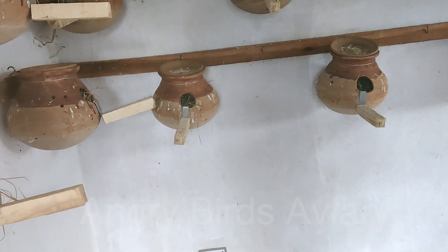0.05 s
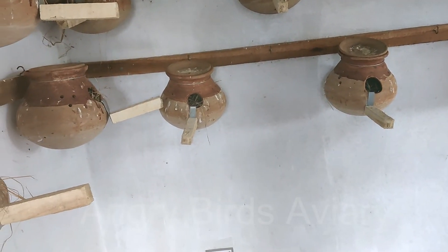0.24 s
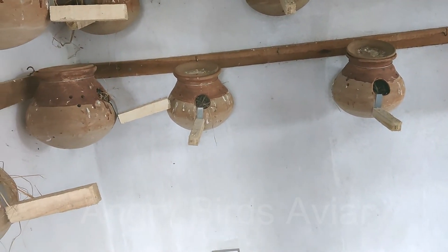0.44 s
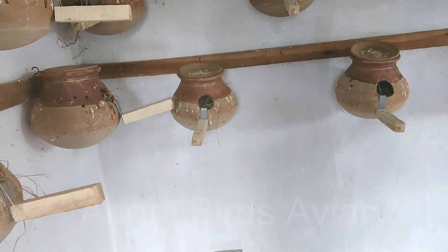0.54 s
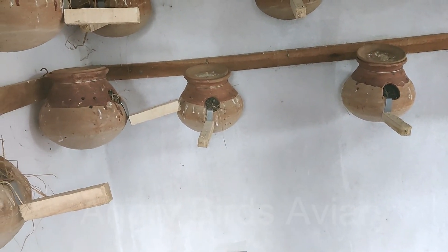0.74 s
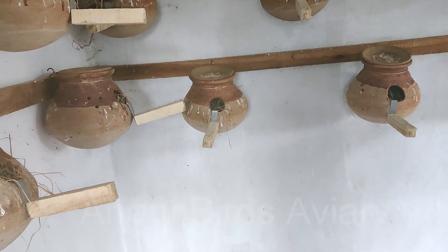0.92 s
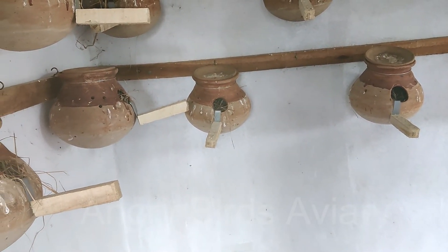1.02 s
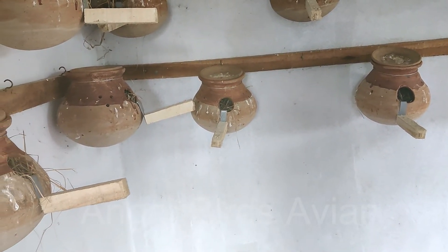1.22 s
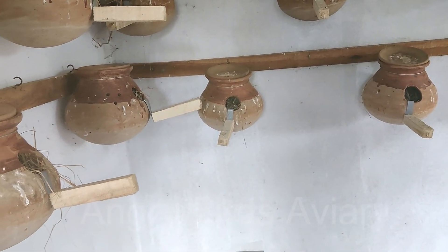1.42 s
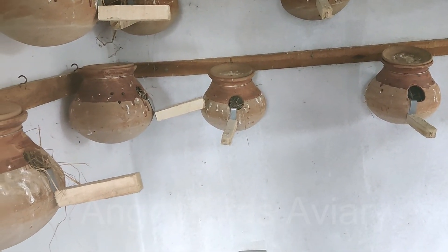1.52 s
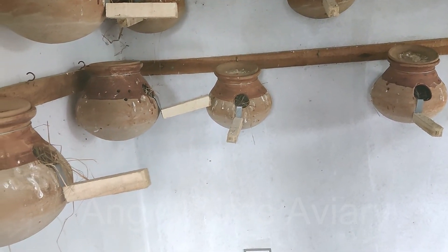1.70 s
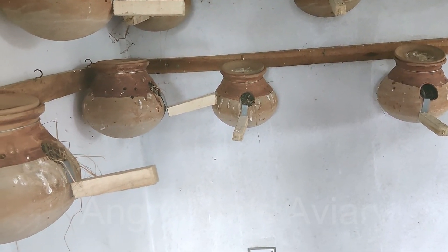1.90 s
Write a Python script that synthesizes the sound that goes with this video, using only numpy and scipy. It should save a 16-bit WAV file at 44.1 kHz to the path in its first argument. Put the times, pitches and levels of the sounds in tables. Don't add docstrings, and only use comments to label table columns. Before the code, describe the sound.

Finch chirps, near and clipped at first, then distant buzzy whistles, over a low fan hum

```python
import sys
import numpy as np
from scipy import signal
from scipy.fft import rfft, irfft, next_fast_len
from scipy.io import wavfile
from scipy.ndimage import uniform_filter1d

SR = 44100
rng = np.random.default_rng(int(sys.argv[2]) if len(sys.argv) > 2 else 0)


def unload_wav(signal):
    wavfile.write(
        sys.argv[1],
        SR,
        np.round(np.clip(np.atleast_2d(signal).T, -1, 1) * 32767).astype(np.int16),
    )


def natural_amplitude(level_db):
    exponent = np.asarray(level_db, float) / 20
    return 10 ** exponent


N = 85995

# freq_hz, density_db_per_hz
AIR_SPECTRUM = [(18, -34.5), (30, 0.5), (71, -14.5), (189, -27.5), (364, -25), (843, -29.5), (1670, -26),
                (3940, -29.5), (6800, -26), (8840, -71), (15000, -120)]
# time_s, gain_db
INPUT_GAIN = [(0, 15), (.1, 8.5), (.5, 7.5), (.8, 5.5), (1.0, 1), (1.95, 0.5)]
# time_s, level_db
FAN_THROB = [(0.0, -49.5), (0.102, -36), (0.314, -36.5), (0.504, -64), (0.65, -43.5), (0.82, -68),
             (0.906, -54), (0.982, -58.5), (1.276, -49), (1.568, -43.5), (1.792, -46.5), (1.95, -63)]
# time_s, level_db
HISS_LEVEL = [(0, -64), (.65, -63), (.85, -76), (1.0, -76), (1.4, -74.5), (1.95, -87)]
# freq_hz, gain_db
MIC_RESPONSE = [(6700, -1.5), (7150, -10), (15000, -32)]
# freq_hz, t60_s
REVERB_TIME = [(1000, 0.49), (3000, 0.49), (6000, 0.31), (12000, 0.57)]
# delay_s, level_db
WALL_ECHOES = [(.012, -5), (0.028, -17), (.037, -21), (0.064, -7)]
# start_s, length_s, start_hz, end_hz, level_db
FAR_WHISTLES = [(0.915, 0.028, 3300, 3216, -56), (1.062, 0.02, 3470, 3230, -40.5),
                (1.085, 0.0585, 2796, 3075, -43.5), (1.12, 0.0324, 2995, 3183, -41),
                (1.14, 0.034, 5980, 6740, -52.5), (1.17, 0.023, 3025, 3326, -48.5),
                (1.2, 0.019, 2958, 2893, -44), (1.3, 0.0555, 3100, 3436, -43),
                (1.335, 0.062, 3120, 4370, -41.5), (1.525, 0.067, 4360, 3627, -45),
                (1.575, 0.071, 3227, 4315, -39.5), (1.605, .075, 5410, 3810, -33.5),
                (1.615, .07, 2908, 1970, -54), (1.73, 0.054, 4926, 4350, -41),
                (1.76, 0.043, 4043, 3486, -31.5), (1.785, 0.02, 5940, 6550, -41),
                (1.81, 0.025, 3902, 3330, -33.5), (1.875, 0.029, 3630, 3520, -50),
                (1.9, 0.044, 2460, 2420, -58.5)]
# start_s, length_s, start_hz, end_hz, level_db
NEAR_SLUR = [
    (0.675, 0.0261, 3523, 2855, -20),
]
# start_s, top_pitch_hz, level_db, half_pitch_lines_db, brightness_db_per_octave
LOW_CHIRPS = [
    (0.0, 2084, -33, -38, 3.5),
    (0.026, 2257, -32, -29, -4.5),
    (0.171, 2023, -20, -16.5, 0.5),
    (0.334, 1964, -22.5, 2.5, 0.2),
]
HIGH_CHIRPS = [
    (0.504, 1584, -21, -4, 12),
    (0.592, 1661, -14.5, -8, 3.3),
    (0.755, 1673, -26.5, -8.5, -15.5),
    (0.796, 1666, -14, -14, 1.7),
]
# freq_hz, gain_db
LOW_THROAT_COLOUR = [(900, -64.5), (2000, -13), (3000, -7), (4000, -6), (5000, -18.5), (5900, -14),
                     (6800, -21), (15000, -31.5)]
HIGH_THROAT_COLOUR = [(800, -83.5), (1600, -34.5), (2400, -8), (3200, 0), (4900, -11), (5800, -26.5),
                      (8200, -26.5), (15000, -34)]
# freq_hz, gain_db
COPY_RESPONSE = [(100, -3.5), (1000, -2.5), (1600, -5.5),
                 (2500, -15), (5000, -19)]

AIR_DB = -59.5
HUM_HZ, HUM_WIDTH_HZ, HUM_DB, HUM_UPPER_DB = 118.6, 22, -66.5, -6.5
THROB_HZ, THROB_TRIM_DB = 43, -4.5
NEAR_WET_DB, NEAR_PAN_DB = 2.5, -3.5
FAR_WET_DB, FAR_PAN_DB = 4, -4
BUILD_S = 0.014
LEFT_LAG_SAMPLES = 17
BUZZ_HZ, BUZZ_DEPTH = 139.9, 0.26
WOBBLE, WOBBLE_PER_GLIDE = 0.036, 0.15
UNDERTONE_DB, OCTAVE_DB = -30, -22
RISE, FALL, TOP_AT = 0.2255, 0.14, 0.568
ATTACK_S, RELEASE_S, CHIRP_S = 0.003, 0.0051, 0.01678
CLIFF_HZ, HOLE_DB, HOLE_THRESHOLD = 7150, -30, -0.35
PATCH_FRAMES, PATCH_BINS = 3, 14
COPY_LEAD_S = 0.0174


def curve(table, hz):
    a = np.array(table, float)
    return np.interp(np.log(np.maximum(hz, 1)), np.log(a[:, 0]), a[:, 1])


def over_time(table):
    return np.interp(np.arange(N) / SR, *np.array(table, float).T)


def colour(x, gain):
    n = next_fast_len(x.shape[-1] + 4096)
    hz = np.arange(n // 2 + 1) * SR / n
    return irfft(rfft(x, n) * gain(hz), n)[..., :x.shape[-1]]


def octave_band(x, centre_hz):
    return colour(x, lambda f: np.clip(1 - abs(np.log2(np.maximum(f, 1) / centre_hz)), 0, 1))


def unit(x):
    return x / np.sqrt(np.mean(x ** 2))


def walk(rate_hz, size=N):
    k = max(int(SR / rate_hz), 2)
    smooth = uniform_filter1d(uniform_filter1d(rng.standard_normal(N), k), k)
    return unit(smooth)[:size]


def add(track, start_s, x):
    i = int(max(start_s, 0) * SR)
    track[i:i + len(x)] += x[:N - i]


def shape(t, length_s, attack_s, release_s):
    ramp = np.minimum(t / attack_s, (length_s - t) / release_s)
    return np.sin(np.pi / 2 * np.clip(ramp, 0, 1)) ** 2


def room_tone():
    mid, side = rng.standard_normal((2, N))
    side = colour(side, lambda f: np.clip((f / 1700) ** 0.53, 0, 1.2))
    pair = mid + side * np.array([[1], [-1]])
    pair = colour(pair, lambda f: natural_amplitude(curve(AIR_SPECTRUM, f) + 2 * curve(MIC_RESPONSE, f))
                  / np.hypot(1, np.clip(f / 1000, 0, 1)))
    out = 0
    for hz in 62.5 * 2 ** np.arange(9):
        flicker_db = walk(2.7) + walk(6)
        out = out + octave_band(pair, hz) * natural_amplitude(flicker_db)
    return unit(out) * natural_amplitude(AIR_DB)


def fan_hum():
    def peak(f, hz):
        return 1 / (1 + ((f - hz) / HUM_WIDTH_HZ * 2) ** 4)

    noise = rng.standard_normal(N)
    hum = colour(noise, lambda f: peak(f, HUM_HZ) + natural_amplitude(HUM_UPPER_DB) * peak(f, 1.48 * HUM_HZ))
    return unit(hum) * natural_amplitude(HUM_DB)


def fan_throb():
    f = THROB_HZ * (1 + 0.0077 * walk(4.8))
    return np.sin(2 * np.pi * np.cumsum(f) / SR) * natural_amplitude(over_time(FAN_THROB) + THROB_TRIM_DB)


def hiss():
    noise = rng.standard_normal((2, N))
    noise = unit(colour(noise, lambda f: (f > 7300) * (8000 / (f + 1)) ** 0.48))
    return noise * natural_amplitude(over_time(HISS_LEVEL) + 1.3 * walk(7.6))


def air():
    return (room_tone() + fan_hum()) * natural_amplitude(over_time(INPUT_GAIN)) + hiss() + fan_throb()


def room(x, wet_db, pan_db, decay=1.0):
    t = np.arange(SR) / SR
    echoes = rng.standard_normal((2, SR)) * natural_amplitude(7 * rng.standard_normal((2, SR)))
    tail = 0
    for hz in 320.0 * 2 ** np.arange(6):
        tail = tail + octave_band(echoes, hz) * natural_amplitude(-60 * t / (decay * curve(REVERB_TIME, hz)))
    tail = tail * (1 - np.exp(-t / BUILD_S))
    tail = tail / np.sqrt(np.sum(tail ** 2) / 2) * natural_amplitude(wet_db)
    tail[0, LEFT_LAG_SAMPLES] += 1
    tail[1, 0] += 1
    for delay_s, db in WALL_ECHOES:
        tail[[0, 1], int(delay_s * SR) + rng.integers(0, 60, size=2)] += natural_amplitude(db)
    wet = signal.fftconvolve(x[None], tail, axes=1)[:, :N]
    return wet * natural_amplitude(np.array([[pan_db], [-pan_db]]) / 2 - wet_db / 2)


def whistles(notes, swell=0.35):
    out = np.zeros(N)
    for start_s, length_s, start_hz, end_hz, db in notes:
        t = np.arange(int(length_s * SR)) / SR
        shake = WOBBLE + WOBBLE_PER_GLIDE * abs(np.log(end_hz / start_hz))
        glide = start_hz + (end_hz - start_hz) * t / length_s
        f = glide * (1 + shake * walk(546, size=len(t)))
        phase = np.cumsum(f) * 2 * np.pi / SR
        tone = np.sin(phase)
        tone = tone + natural_amplitude(UNDERTONE_DB) * np.sin(phase / 2)
        tone = tone + natural_amplitude(OCTAVE_DB) * np.sin(2 * phase)
        tone = tone * (1 + BUZZ_DEPTH * np.sin(2 * np.pi * BUZZ_HZ * t))
        add(out, start_s, natural_amplitude(db) * tone * shape(t, length_s, swell * length_s, 0.41 * length_s))
    return out


def near_bird(calls, throat, jitter, rasp, bend):
    out = np.zeros(N)
    t = np.arange(int(CHIRP_S * SR)) / SR
    u = t / CHIRP_S - TOP_AT
    arch = 1 - np.where(u < 0, RISE * (u / TOP_AT) ** 2, FALL * (u / (1 - TOP_AT)) ** 2)
    for start_s, top_hz, db, half_db, tilt_db in calls:
        shake = walk(600, size=len(t))
        f = top_hz * arch ** bend * (1 + jitter * (shake - shake.mean()))
        half_phase = np.cumsum(f) * np.pi / SR
        tone = 0
        for k in range(1, 19):
            line_hz = k * f / 2
            line_db = curve(throat, line_hz) + half_db * (k % 2)
            line_db = line_db + tilt_db * np.log2(np.minimum(line_hz / 3200, 1.4))
            tone = tone + natural_amplitude(line_db) * np.sin(k * half_phase + k * k) * (line_hz < 15500)
        tone = tone * (1 + rasp * walk(2500, size=len(t)))
        add(out, start_s, natural_amplitude(db) * tone * shape(t, CHIRP_S, ATTACK_S, RELEASE_S))
    return out


def scene():
    far = whistles(FAR_WHISTLES)
    slur = whistles(NEAR_SLUR, swell=0.045)
    low = near_bird(LOW_CHIRPS, LOW_THROAT_COLOUR, jitter=0.036, rasp=0.54, bend=0.515)
    high = near_bird(HIGH_CHIRPS, HIGH_THROAT_COLOUR, jitter=0.022, rasp=0.2, bend=1.083)
    birds = room(far, FAR_WET_DB, FAR_PAN_DB, decay=0.83)
    for near in (slur, low, high):
        birds = birds + room(near, NEAR_WET_DB, NEAR_PAN_DB)
    return colour(birds, lambda f: natural_amplitude(curve(MIC_RESPONSE, f))) + air()


def early_copy(x):
    lead = int(COPY_LEAD_S * SR)
    early = np.concatenate([x[:, lead:], x[:, -lead:]], axis=1)
    response = COPY_RESPONSE + [(15000, -6.5)]
    return colour(early, lambda f: natural_amplitude(curve(response, f)))


def patchy_treble(x):
    f, _, z = signal.stft(x, SR, nperseg=2048)
    field = rng.standard_normal(z.shape[1:])
    field = uniform_filter1d(field, PATCH_FRAMES, axis=1)
    field = unit(uniform_filter1d(field, PATCH_BINS, axis=0))
    lines = unit(uniform_filter1d(rng.standard_normal(z.shape), PATCH_FRAMES, axis=2))
    gain = natural_amplitude(HOLE_DB * (field < HOLE_THRESHOLD) + 6 * lines - 3)
    z = z * np.where(f[:, None] > CLIFF_HZ, gain, 1)
    return signal.istft(z, SR, nperseg=2048)[1][:, :N]


def band_limit(x):
    return signal.sosfilt(signal.butter(12, 15540, fs=SR, output="sos"), x)


def record(dry):
    mix = patchy_treble(dry + early_copy(dry))
    return band_limit(mix)


dry = scene()
out = record(dry)
unload_wav(out)
```